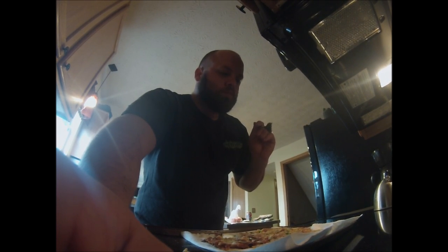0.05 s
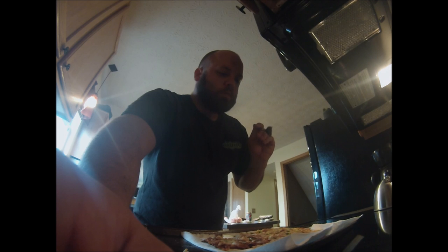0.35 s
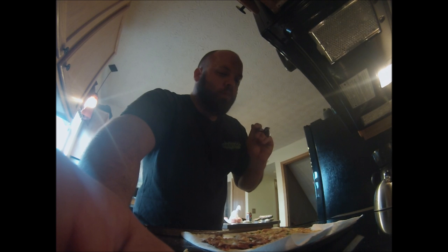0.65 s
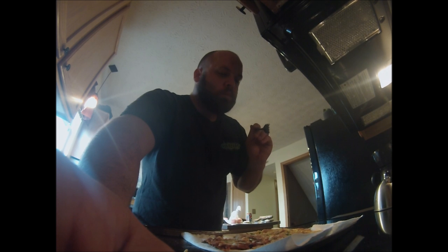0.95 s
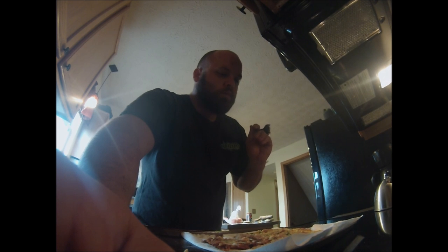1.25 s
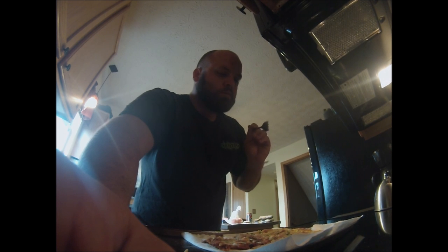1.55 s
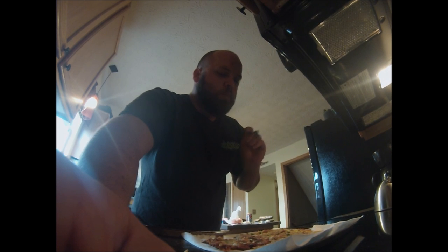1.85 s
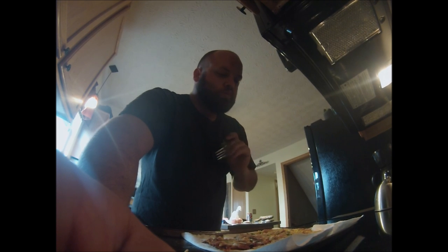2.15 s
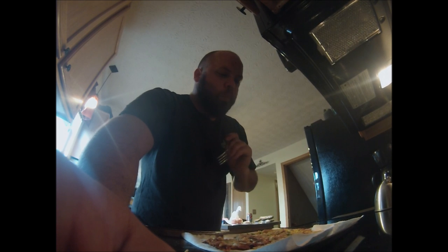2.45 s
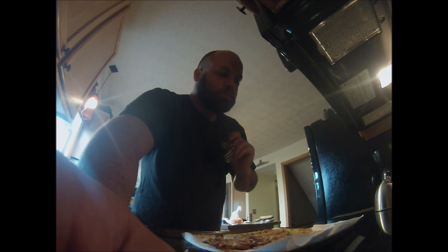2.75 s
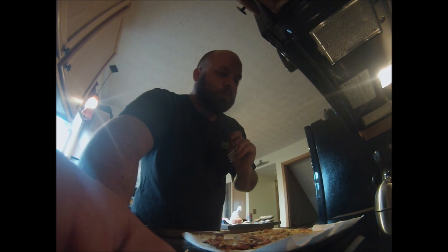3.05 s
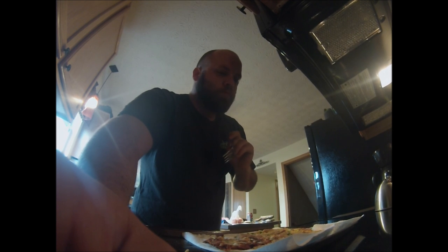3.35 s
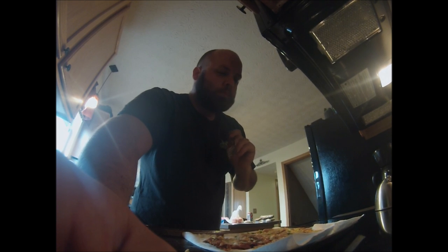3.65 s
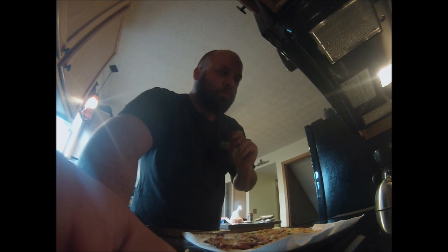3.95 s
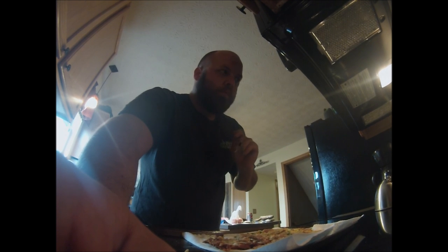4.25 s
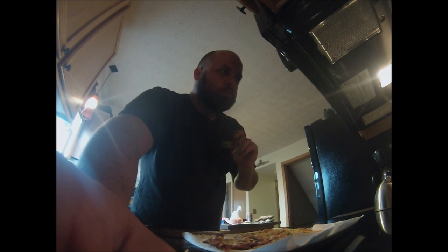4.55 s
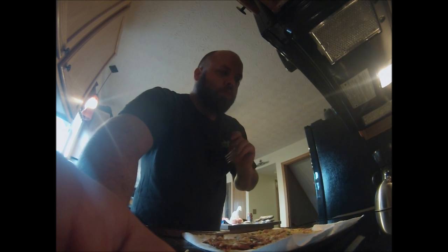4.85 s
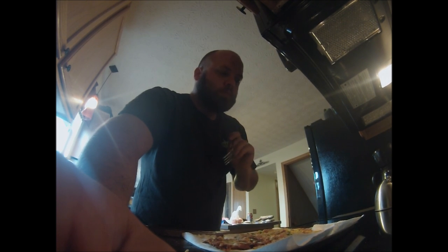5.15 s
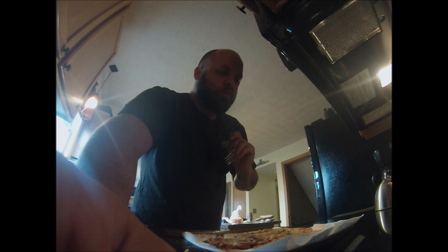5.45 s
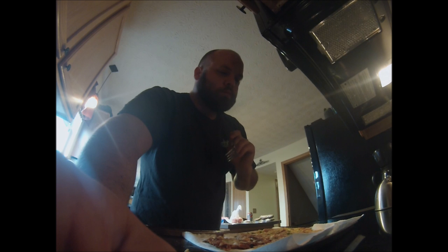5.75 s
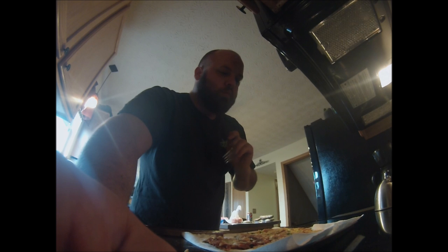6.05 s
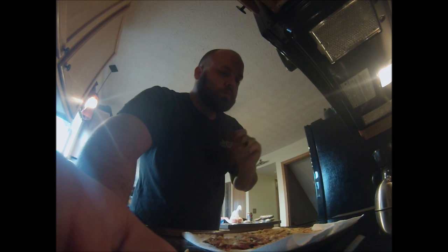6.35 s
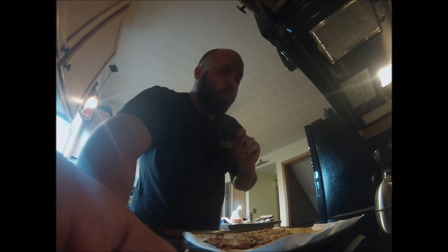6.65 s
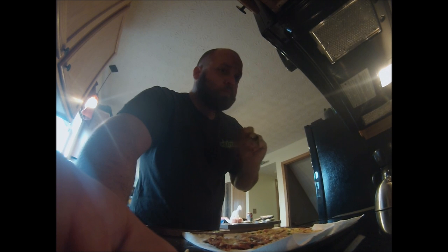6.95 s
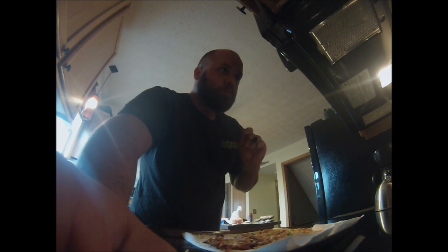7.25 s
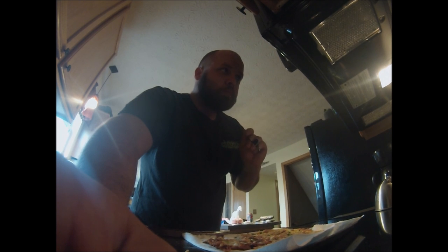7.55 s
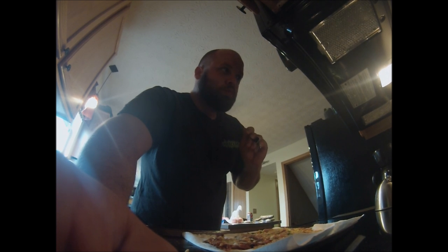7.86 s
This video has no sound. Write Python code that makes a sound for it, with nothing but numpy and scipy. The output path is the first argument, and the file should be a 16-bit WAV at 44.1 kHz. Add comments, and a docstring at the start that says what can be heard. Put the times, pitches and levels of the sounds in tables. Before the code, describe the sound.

A kitchen range hood fan runs at one steady speed, a droning rush of air over a faint motor hum.

```python
"""From the first moment a kitchen range hood runs at one steady speed: turbulent air from the blower
rings in the duct and the sheet-metal hood, coloured by the kitchen's reflections. Underneath, the
slightly unbalanced rotor hums once a turn and the motor adds a faint whine. About two seconds in,
a faint, brief ring near 4.2 kHz sounds in the rush. The rush carries on to the end, its two low
bands droning and wavering in loudness all the way."""
import sys
import numpy as np
from scipy import signal
from scipy.fft import rfft, irfft
from scipy.io import wavfile
from scipy.ndimage import uniform_filter1d

SR = 44100
rng = np.random.default_rng(int(sys.argv[2]) if len(sys.argv) > 2 else 0)


def transcribe(signal):
    """Save signal, clipped to [-1, 1], as a 16-bit WAV file at the path in sys.argv[1]."""
    frames = np.atleast_2d(signal).T
    limited = np.clip(frames, -1, 1)
    pcm = np.round(limited * 32767).astype(np.int16)
    wavfile.write(sys.argv[1], SR, pcm)


N = 357651

# Tone of the raw rush through the blower: (frequency [Hz], relative level [dB])
RUSH_SPECTRUM = [(12, -26), (35, -7.5), (75, -3.5), (260, -0.1), (310, -9), (550, -4.5), (1100, -8),
                 (1470, -24), (3500, -29.5), (5600, -34), (6400, -40), (9500, -50.5), (12800, -58),
                 (13100, -61), (14100, -66.5), (14500, -70), (15000, -74)]
# Resonances of duct, cavity and hood panels: (centre [Hz], width [Hz], lift above the rush [dB])
HOOD_RESONANCES = [(103.4, 13.8, 14), (122.5, 6.1, 11), (153, 9.3, 8.5), (166.5, 9.1, 6), (179.7, 10.8, 13),
                   (199.5, 15, 8.5), (212.4, 9, 11.5), (222, 4.2, 6), (340.6, 18, 7.5), (387, 39, 9.5),
                   (419.6, 8.5, 10), (454, 14, 9), (481.6, 31, 7), (575, 16, 5), (609, 62, 3.5),
                   (759, 57, 5), (893, 57, 7), (941, 25, 7.5), (1007, 58, 3.8), (1203, 80, 3),
                   (1325, 98, 4), (1638, 31, 7), (1760, 30, 13), (1823, 116, 12), (1945, 49, 13.5),
                   (2040, 90, 7.5), (2205, 23, 5), (2446, 70, 4.5), (2974, 250, 8.5), (3078, 89, 9.5),
                   (3266, 71, 9.5), (3900, 160, 2.5), (4196, 90, 5.5), (5170, 130, 7.5), (5524, 420, 7.5),
                   (7020, 325, 4), (8700, 177, 3.5)]
# Random wavering in loudness of the lower of the rush's two low bands: (time [s], rms level [dB])
LOWER_BAND_WAVER = [(0.0, -30.5), (1.05, -31), (1.3, -28), (1.68, -28.5), (2.45, -31), (2.93, -27.5),
                    (3.38, -33), (3.8, -27), (4.02, -32.5), (4.9, -30.0), (5.6, -32.5), (6.3, -32),
                    (6.56, -26), (6.8, -33), (7.03, -26), (7.2, -30.5), (8.1, -31.5)]
# Random wavering in loudness of the upper of the rush's two low bands: (time [s], rms level [dB])
UPPER_BAND_WAVER = [(0.0, -27.0), (0.8, -29.5), (1.05, -25.5), (1.3, -29), (3.05, -26.5), (3.4, -29),
                    (3.92, -27), (4.3, -31), (4.7, -26), (5.1, -29.5), (5.75, -26), (6.35, -30),
                    (6.72, -27), (7.1, -30.5), (7.68, -23.5), (7.9, -32), (8.1, -29)]
# A faint, brief ring in the rush: (time [s], pitch [Hz], level [dB], time to fall 60 dB [s])
FAINT_RING = (1.985, 4180, -54, 0.7)


def airflow(level_db, flutter_db, flutter_hz):
    """The bed: turbulence, fluttering as eddies pass, sounds through the hood into the kitchen."""
    hz = np.fft.rfftfreq(N, 1 / SR)
    turbulence = rng.standard_normal(N) * gain_of(flutter_db * drift(flutter_hz))
    room = kitchen_reflections(hz, ripple_db=1, t60_s=0.37, from_hz=570)
    colour = gain_of(spectrum_at(RUSH_SPECTRUM, hz)) * hood_resonance(hz) * room
    return gain_of(level_db) * unit_rms(irfft(rfft(turbulence) * colour, N))


def hood_resonance(hz):
    """The body, as a gain curve: each duct or panel resonance lifts the rush around its own pitch."""
    power = np.ones(len(hz))
    for centre, width, lift_db in HOOD_RESONANCES:
        detune = 2 * (hz - centre) / width
        power += (gain_of(lift_db) ** 2 - 1) / (1 + (np.sqrt(2) - 1) * detune ** 2) ** 2
    return np.sqrt(power)


def waver_band(air, levels, band_hz):
    """Returns the rush with one low band wavering along a level curve, its quick random throb kept."""
    hz = np.fft.rfftfreq(N, 1 / SR)
    low, high = band_hz
    band = irfft(rfft(air) * ((hz > low) & (hz < high)), N)
    slow_rms = np.sqrt(uniform_filter1d(band ** 2, round(.25 * SR)))
    target_rms = gain_of(np.interp(np.arange(N) / SR, *np.transpose(levels)))
    return air + band * (target_rms / slow_rms - 1)


def motor(shaft_hz, hum_db, whine_hz, whine_db, waver_db):
    """The unbalanced rotor's hum and the motor's whine follow one almost constant speed."""
    speed = 1 + 0.00068 * drift(0.85)
    phase_per_hz = 2 * np.pi * np.cumsum(speed) / SR
    hum = unit_rms(np.sin(shaft_hz * phase_per_hz) * gain_of(waver_db * drift(2)))
    whine = unit_rms(np.sin(whine_hz * phase_per_hz) * gain_of(waver_db * drift(3)))
    return gain_of(hum_db) * hum + gain_of(whine_db) * whine


def faint_ring(start_s, hz, level_db, t60_s, attack_s=.008):
    """A barely audible accent: one high tone rings briefly and sinks under the rush."""
    age = np.maximum(np.arange(N) / SR - start_s, 0)
    envelope = np.minimum(age / attack_s, 1) * gain_of(level_db - 60 * age / t60_s)
    return envelope * np.sin(2 * np.pi * hz * age)


def kitchen_reflections(hz, ripple_db, t60_s, from_hz):
    """The room, as a gain curve: echoes off walls and cupboards finely comb the mids and treble."""
    t = np.arange(N) / SR
    echoes = rng.standard_normal(N) * gain_of(-60 * t / t60_s) * (t > .006)
    comb = unit_rms(rfft(echoes).real)
    bass_rolloff = hz ** 2 / (hz ** 2 + from_hz ** 2)
    return gain_of(ripple_db * comb * bass_rolloff)


def drift(rate_hz):
    """Smooth random modulation of rms 1, moving at up to about this rate."""
    hz = np.fft.rfftfreq(N, 1 / SR)
    noise_spectrum = rfft(rng.standard_normal(N)) * (hz > 0)
    return unit_rms(irfft(noise_spectrum / (1 + (hz / rate_hz) ** 4), N))


def spectrum_at(points, hz):
    """Joins the points of an EQ curve by straight lines over log frequency."""
    point_hz, point_db = np.transpose(points)
    return np.interp(np.log(hz + 1), np.log(point_hz + 1), point_db)


def gain_of(db):
    """Decibels to amplitude."""
    return 10 ** (np.asarray(db) / 20)


def unit_rms(x):
    """Scales to rms 1."""
    return x / np.sqrt(np.mean(x ** 2) + 1e-20)


def scene():
    """The mono mix: droning air in front, the motor and the faint ring tucked underneath."""
    air = airflow(level_db=-23, flutter_db=0.31, flutter_hz=26)
    air = waver_band(air, LOWER_BAND_WAVER, band_hz=(80, 135))
    air = waver_band(air, UPPER_BAND_WAVER, band_hz=(155, 230))
    motor_tones = motor(shaft_hz=52.45, hum_db=-43.5, whine_hz=1590, whine_db=-67, waver_db=2)
    return (air + motor_tones + faint_ring(*FAINT_RING))[None]


def record(dry):
    """A steep high cut at 15.1 kHz takes off the very top of the hiss."""
    high_cut = signal.firwin(511, 15100, window=("kaiser", 9), fs=SR)
    return signal.oaconvolve(dry, high_cut[None], "same")


dry = scene()
out = record(dry)
transcribe(out)
```